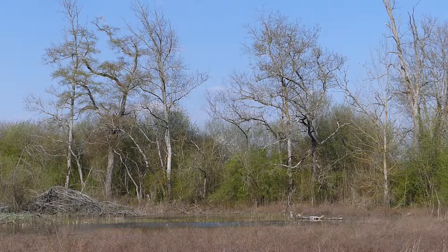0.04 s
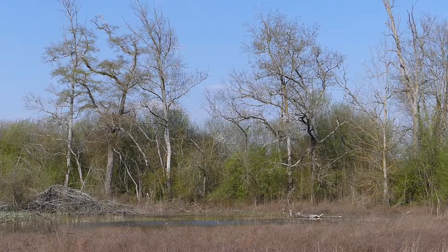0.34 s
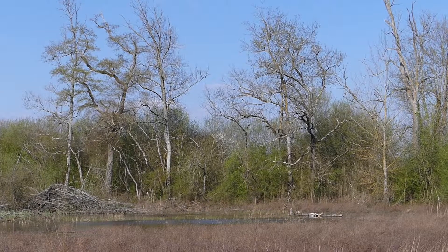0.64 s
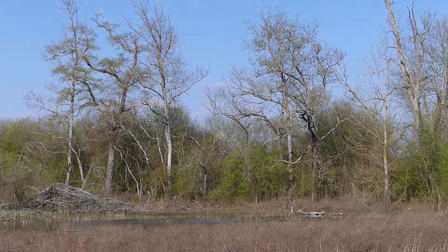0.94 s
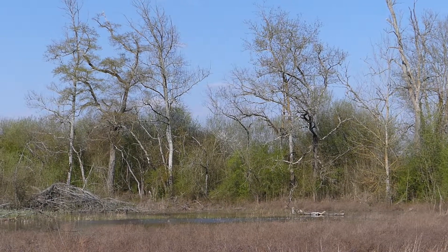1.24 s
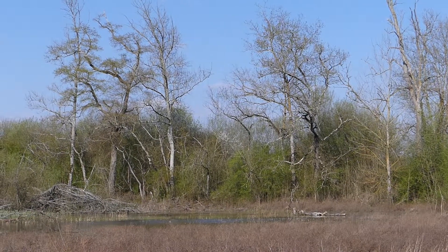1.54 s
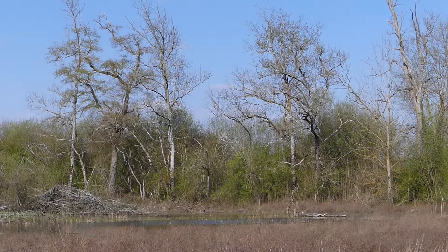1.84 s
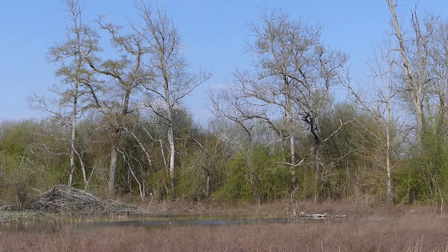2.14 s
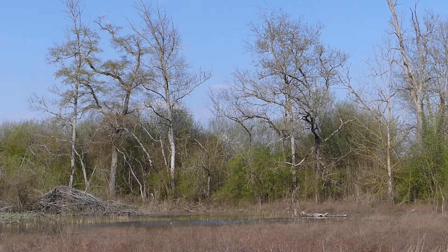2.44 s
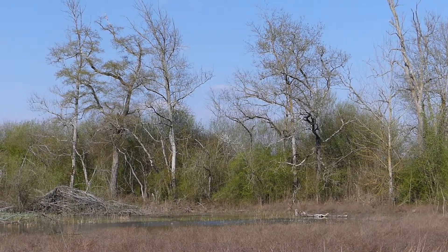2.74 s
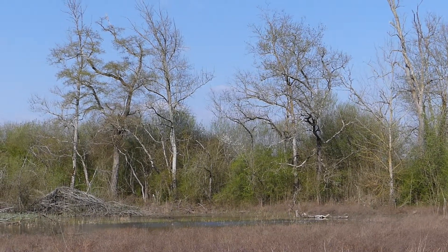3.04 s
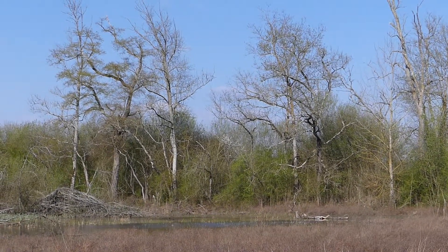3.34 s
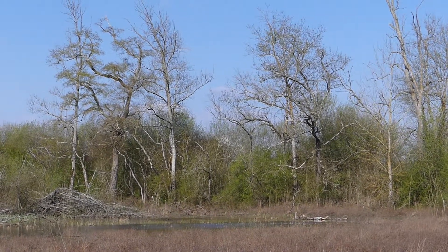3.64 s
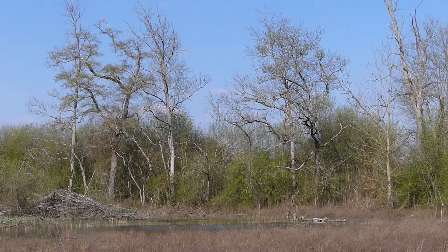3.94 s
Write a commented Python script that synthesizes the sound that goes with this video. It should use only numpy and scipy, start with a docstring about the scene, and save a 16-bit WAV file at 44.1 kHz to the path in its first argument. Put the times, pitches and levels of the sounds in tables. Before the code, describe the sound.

A chorus of frogs croaking near and far across a pond, with light wind.

```python
"""A frog chorus from the bank of a marshy pond, in stereo. It fades in on a far crowd, faint hiss and a
low breeze, with croaks and then quacks close by; every call is a train of pulses ringing a vocal sac.
From about one second, thin whistles carry across the marsh and dry stalks tick near the microphone.
Midway, three puffs of wind bump the microphone; near the end come two rattling croaks.
All along, the reeds scatter the calls and the trees around the water answer."""
import sys
import numpy as np
from scipy import signal
from scipy.fft import rfft, irfft, next_fast_len
from scipy.io import wavfile
from scipy.ndimage import uniform_filter1d, map_coordinates

SR = 44100
rng = np.random.default_rng(int(sys.argv[2]) if len(sys.argv) > 2 else 0)


def pcm_store(signal):
    """Save signal as 16-bit PCM."""
    levels = np.round(np.clip(np.atleast_2d(signal), -1, 1) * 32767)
    wavfile.write(sys.argv[1], SR, levels.astype(np.int16).T)


N = 176400


def amp(db):
    """Decibels to gain."""
    return 10 ** (np.asarray(db) / 20)


def unit(x):
    """Scale to rms 1."""
    return x / np.sqrt(np.mean(x ** 2) + 1e-20)


def along(points, hz):
    """Read between (Hz, value) points on a log frequency axis."""
    freqs, values = np.transpose(points)
    return np.interp(np.log(hz + 1), np.log(freqs + 1), values)


def wobble(rate):
    """A smooth random curve, rate knots a second."""
    return map_coordinates(rng.standard_normal(int(N * rate / SR) + 4), [np.arange(N) * rate / SR])


def filtered(x, response):
    """Filter x by a gain given as a function of Hz."""
    size = next_fast_len(x.shape[-1] + 8192)
    return irfft(rfft(x, size) * response(np.fft.rfftfreq(size, 1 / SR)), size)[..., :x.shape[-1]]


def add(track, start, sound):
    """Mix a sound into the track at start seconds."""
    part = track[..., max(0, round(start * SR)):][..., :sound.shape[-1]]
    part += sound[..., :part.shape[-1]]


def swell(sound, peak, rise, fall):
    """Shape a call: up to its loudest point (0-1) and down again, on power curves."""
    u = np.linspace(0, 1, len(sound))
    return sound * np.minimum(u / peak, 1) ** rise * np.minimum((1 - u) / (1 - peak), 1) ** fall


# Open air at the microphone. Each row: frequency in Hz, left-right correlation.
LIKENESS = [(60, 0.23), (400, 0.18), (800, 0.53), (1500, 0.79), (2500, 0.62), (5000, 0.5), (12000, 0.43)]
def widen(pair):
    """Two unrelated signals to left and right, as alike as the open air makes them."""
    turn = lambda hz: np.arccos(along(LIKENESS, hz)) / 2
    mid, side = filtered(pair, lambda hz: np.array([np.cos(turn(hz)), np.sin(turn(hz))]))
    return np.array([mid + side, mid - side])


def rush(spectrum, patchy_db):
    """Stereo noise of rms 1 with patches of random gain in time and frequency."""
    bins = signal.stft(rng.standard_normal((2, N)), nperseg=512)[2]
    patches = uniform_filter1d(uniform_filter1d(rng.standard_normal(bins.shape[1:]), 5, 0), 8, 1)
    pair = signal.istft(bins * amp(patchy_db * unit(patches)), nperseg=512)[1][:, :N]
    return unit(widen(filtered(pair, lambda hz: amp(along(spectrum, hz)))))


# The far end of the marsh. Each row: frequency in Hz, relative level in dB.
WASH_SPECTRUM = [(150, -40), (280, -10), (385, -1.5), (500, -6), (770, -3), (960, -12), (1200, 2),
                 (1500, -3), (2100, -9.5), (2450, -13), (2850, -25.5), (3650, -20), (4300, -34),
                 (5200, -42.5)]
def farthest_frogs(level_db=-42.5):
    """So many frogs, so far off, that they blur into a wavering wash."""
    return amp(level_db + 2.0 * wobble(5.52)) * rush(WASH_SPECTRUM, patchy_db=3.0)


# The background on the bank, high and low. Each row: frequency in Hz, relative level in dB.
HISS_SPECTRUM = [(1000, -4.5), (3000, -5.5), (5000, 6.5), (7000, 2), (7800, -2), (9500, 4.5), (12000, -0.5),
                 (15500, -3)]
BREEZE_SPECTRUM = [(25, -26), (45, -20.5), (70, -3.5), (200, -4), (350, -3), (600, -11.5), (1500, -46)]
def hiss_and_breeze(hiss_db=-60.5, breeze_db=-50.5):
    """A faint high hiss over the low, uneven rush of the breeze."""
    hiss = amp(hiss_db) * rush(HISS_SPECTRUM, patchy_db=2.3)
    breeze = amp(breeze_db + 0.73 * wobble(8.76)) * rush(BREEZE_SPECTRUM, patchy_db=2.5)
    return hiss + breeze


CROAK_PULSE_HZ = 381.6
# A frog's body resonances. Each row: frequency in Hz, level in dB against the sac, ring in seconds.
BODY_MODES = [(385, -22, .0012), (560, -30, .0005), (775, -25, .0009), (1170, -19, .0008)]
def frog_voice(length, sac_hz, pulse_hz, overtone_db, jitter, tone_db=1, buzz_db=-6):
    """Pulses ring the sac, its overtone and the body; sac_hz and pulse_hz glide (first, last)."""
    n = int(length * SR)
    chance = rng.standard_normal((160, 2))
    glide = np.linspace(0, 1, n) ** 1.45  # the pulse rate holds at first and moves late in the call
    cycles = np.cumsum(pulse_hz[0] * (pulse_hz[1] / pulse_hz[0]) ** glide) / SR
    onsets = np.interp(np.arange(int(cycles[-1]) + 1), cycles, np.arange(n))[:len(chance)]
    late, strength = chance[:len(onsets)].T
    onsets = np.abs(onsets + jitter * late * SR / pulse_hz[0])  # jitter is in pulse periods
    index = np.ceil(onsets).astype(int)[:, None] + np.arange(SR // 100)
    age = (index - onsets[:, None]) / SR  # seconds since the pulse, one row for each
    train = lambda rows: np.bincount(index.ravel(), (rows * amp(1.43 * strength)[:, None]).ravel(), n)[:n]

    sac = np.interp(onsets, [0, n], sac_hz)[:, None]
    overtone = 4240 * (1.894 * sac / 4240) ** 0.39  # stays near 4240 Hz, following the sac only in part
    buzz = (3306, overtone_db + buzz_db, 0.00025)  # so short a ring that it sounds broad
    modes = [(sac, 0, 0.0005), (overtone, overtone_db, 0.00033), buzz, *BODY_MODES]
    rings = sum(amp(db) * age / ring_s * np.exp(-age / ring_s) * np.sin(2 * np.pi * hz * age)
                for hz, db, ring_s in modes)

    # Fed briefly by each pulse, the sac sings on between them, never quite steady.
    wander = map_coordinates(rng.standard_normal(32), [np.arange(n) * 55.1 / SR], mode='mirror')
    note_hz = np.linspace(*sac_hz, n) * (1 + 0.01826 * wander)
    tone = train(age * np.exp(-age / 0.00076)) * np.sin(2 * np.pi * np.cumsum(note_hz) / SR)
    return unit(unit(train(rings)) + amp(tone_db) * unit(tone))


# The chorus across the pond, rising and ebbing. Each row: time in seconds, relative level in dB.
CROWD_LEVELS = [(.5, -44.5), (1.201, -44), (1.5, -45.5), (1.65, -41.5), (1.85, -58.5), (2.2, -37),
                (2.45, -52), (2.8, -50), (3.25, -38.5), (3.8, -39.5), (4, -43)]
def far_frogs(calls_per_s=45, gain_db=2):
    """A crowd croaks at random, each call with its own length, level, note, pace and side."""
    out = np.zeros((2, N))
    calls = rng.standard_normal((int(calls_per_s * N / SR), 6))
    for k, (when, long, loud, note, pace, side) in enumerate(calls):
        sac_hz = 1714 * np.exp(0.17 * np.clip(note, -1.4, 1.6))
        pulse_hz = CROAK_PULSE_HZ * np.exp(0.11 * pace)
        length = 0.0475 * np.exp(0.31 * long)
        call = frog_voice(length, (sac_hz * .94, sac_hz * 1.06), (pulse_hz * 1.04, pulse_hz * .96),
                          overtone_db=-16.5, jitter=0.056)
        gains = amp(2.2 * loud + 1.2 * side * np.array([[1], [-1]]))
        add(out, (k + when) / calls_per_s, gains * swell(call, peak=.5, rise=.7, fall=.7))
    return unit(out) * amp(gain_db + np.interp(np.arange(N) / SR, *np.transpose(CROWD_LEVELS)))


# Lower calls on the near bank. Each row: start and length in seconds, level in dB,
# first and last sac note in Hz.
NEAR_CROAKS = [(0.392, 0.072, -35, 1694, 1940), (0.455, 0.051, -28.5, 1231, 1456),
               (.53, 0.045, -27, 1980, 1794), (0.575, 0.022, -28, 1267, 1233),
               (0.726, 0.021, -26.5, 1360, 1604), (0.737, 0.051, -24.5, 1947, 2084),
               (.83, 0.038, -30.5, 1151, 1447), (.989, 0.027, -27, 1979, 1750),
               (1.015, 0.043, -27.5, 1360, 1692), (1.205, 0.029, -26.5, 1428, 1483),
               (1.231, 0.021, -27, 1678, 1750), (1.277, 0.034, -34.5, 1948, 1970),
               (1.351, 0.044, -32, 1878, 1742), (1.389, 0.032, -25.5, 1487, 1700),
               (1.418, 0.023, -52, 1710, 1820), (1.515, 0.038, -44, 1285, 1450),
               (1.556, 0.07, -30.5, 1652, 1842), (1.606, 0.058, -28, 1461, 1533),
               (1.655, 0.029, -26, 1493, 1673), (1.681, 0.029, -34, 1750, 1735),
               (1.747, 0.053, -40.5, 1108, 1273), (1.877, 0.023, -38, 1266, 1124),
               (2.053, 0.088, -28, 1600, 1710), (2.13, 0.026, -27, 1575, 1450),
               (2.162, 0.034, -24, 1481, 1575), (2.198, .027, -22.5, 1588, 1899),
               (2.224, 0.013, -47, 1800, 1850), (2.375, 0.026, -33, 1284, 1403),
               (2.513, 0.031, -33.5, 1290, 1643), (2.663, 0.11, -39.5, 1330, 1590),
               (2.8, 0.033, -37, 1054, 1155), (2.831, 0.032, -31, 1186, 1372),
               (2.992, 0.089, -31, 1299, 1534), (3.017, 0.0677, -30.5, 1835, 2030),
               (3.138, 0.077, -35, 2140, 1917), (3.189, 0.042, -27.5, 1690, 1540),
               (3.222, 0.032, -28, 1890, 1630), (3.241, 0.038, -28.5, 1384, 1666),
               (3.28, 0.046, -30.5, 1277, 1345), (3.4, 0.043, -33, 1255, 1260),
               (3.513, 0.028, -29, 1457, 1267), (3.526, 0.046, -35.5, 1980, 2250),
               (3.565, 0.036, -24, 1507, 1748), (3.594, 0.03, -32.5, 1727, 1754),
               (3.641, .034, -28, 1150, 1334), (3.716, 0.029, -27, 1263, 1194),
               (3.714, 0.034, -26, 1684, 1842), (3.768, 0.014, -21.5, 1770, 1790),
               (3.779, 0.041, -27.5, 1892, 1790), (3.897, 0.022, -31, 1220, 1320)]
def croaks(easy_db=-30):
    """Croaks swell while the sac note glides; effort above an easy croak brightens the overtone."""
    out = np.zeros(N)
    for start, length, db, first_hz, last_hz in NEAR_CROAKS:
        pulse_hz = CROAK_PULSE_HZ * np.exp(0.04 * rng.standard_normal())
        call = frog_voice(length, (first_hz, last_hz), (pulse_hz * 1.03, pulse_hz * .97),
                          overtone_db=-20.5 + 0.82 * (db - easy_db), jitter=0.018)
        add(out, start, amp(db) * swell(call, peak=0.61, rise=0.65, fall=0.6))
    return out


# Bright calls on the near bank. Each row: start and length in seconds, level in dB, sac note in Hz,
# first and last pulse rate in Hz, loudest point from 0 to 1, overtone in dB.
NEAR_QUACKS = [(0.607, 0.07, -24.5, 2118, 439.6, 259.3, 0.22, -27),
               (0.818, 0.073, -24, 2192, 439.8, 242.8, 0.11, -14),
               (0.898, 0.069, -26, 2284, 555.4, 281.3, 0.03, -14),
               (1.064, 0.049, -24, 2230, 560, 349.2, 0.43, -11.5),
               (1.248, 0.025, -21, 2034, 555, 489, 0.97, -13.5),
               (1.784, 0.033, -39, 2350, 493, 353, 0.05, -22),
               (1.915, 0.055, -32, 2150, 511.5, 332, 0.47, -21.5),
               (2.112, 0.08, -31, 2110, 375, 387.5, 0.22, -12),
               (2.453, 0.056, -36, 2336, 490, 393, 0.27, -23),
               (2.596, 0.043, -37, 2220, 475, 330, 0.2, -26),
               (2.733, .035, -39.5, 2260, 488, 372, 0.4, -18),
               (2.872, .07, -27, 1812, 483, 296.4, 0.28, -26.5),
               (3.077, 0.064, -26, 2080, 523, 315.3, 0.1, -17.5),
               (3.271, .045, -25.5, 1954, 504, 347, 0.33, -20.5),
               (3.678, 0.058, -32.5, 2270, 470, 336, 0.3, -17),
               (3.829, 0.036, -32, 2270, 473.7, 358.5, 0.3, -37),
               (3.966, 0.066, -39, 2320, 477.5, 370, 0.25, -24)]
# Weak quacks are rougher. Each row: call level in dB, jitter in pulse periods.
QUACK_ROUGHNESS = [(-40, .06), (-33, .04), (-27, .008), (-23, .003)]
def quacks():
    """Buzzy quacks: the sac note droops a little and, in nearly all, the pulses slow down."""
    out = np.zeros(N)
    for start, length, db, sac_hz, first_rate, last_rate, peak, overtone_db in NEAR_QUACKS:
        jitter = np.interp(db, *np.transpose(QUACK_ROUGHNESS))
        call = frog_voice(length, (sac_hz, sac_hz * .97), (first_rate, last_rate), overtone_db, jitter,
                          tone_db=-13, buzz_db=5.5)
        add(out, start, amp(db) * swell(call, peak, rise=0.76, fall=0.66))
    return out


# Held calls far across the marsh. Each row: start and length in seconds, level in dB, note in Hz.
FAR_WHISTLES = [(2.68, .42, -58, 3600), (1.1, .28, -57, 4200), (1.55, .14, -52, 3950),
                (2.06, .2, -52, 3800)]
def whistles(width_hz=120):
    """Thin, fuzzy notes: narrow bands of noise that grow until just before they stop."""
    out = np.zeros(N)
    for start, length, db, note_hz in FAR_WHISTLES:
        band = filtered(rng.standard_normal(SR), lambda hz: np.exp(-((hz - note_hz) / width_hz) ** 2))
        add(out, start, amp(db) * swell(unit(band[:int(length * SR)]), peak=0.97, rise=0.41, fall=0.6))
    return out


# Dry stalks close to the microphone. Each row: start in seconds, level in dB, ring in Hz.
STALK_TICKS = [(1.1645, -27.5, 3370), (1.1738, -40, 7400), (1.861, -46, 6700), (1.894, -45, 6850),
               (2.2368, -35, 9600), (2.2437, -24.5, 4300), (2.2446, -35.5, 8900), (3.9558, -38, 3500),
               (3.9755, -31, 10000), (3.9925, -50, 9900)]
def stalks(ring_s=0.00072, crack_s=0.00061, crack_db=-5, tail_s=0.018, tail_db=-24):
    """Dry stalks tick: a crack, a brief ring and a faint scatter."""
    out, t = np.zeros((2, N)), np.arange(SR // 20) / SR
    for start, db, hz in STALK_TICKS:
        crack = amp(crack_db) * np.exp(-t / crack_s) * rng.standard_normal(len(t))
        ring = np.exp(-t / ring_s) * np.sin(2 * np.pi * hz * t)
        tail = amp(tail_db) * np.exp(-t / tail_s) * rng.standard_normal((2, len(t)))
        add(out, start, amp(db) * (crack + ring + tail))
    return out


# Wind right on the microphone, in three clusters. Each row: centre and half width in seconds,
# level in dB, frequency in Hz.
WIND_BUMPS = [(1.883, 0.0076, -23.5, 169), (1.895, 0.013, -26.5, 100), (1.899, 0.0053, -32.5, 273),
              (2.09, .008, -29.5, 114), (2.113, 0.006, -22, 163), (2.408, 0.0038, -32, 155),
              (2.428, 0.0065, -33.5, 270), (2.438, 0.0082, -25, 116)]
def wind_puffs(side_db=-8.5):
    """Each bump of wind shakes both microphone ports for a few cycles, not quite alike."""
    t = np.arange(N) / SR
    push = sum(amp(db) * np.exp(-((t - centre) / width) ** 2 + 2j * np.pi * hz * (t - centre))
               for centre, width, db, hz in WIND_BUMPS)
    mid, side = push.imag, amp(side_db) * push.real  # a quarter cycle apart
    return np.array([mid + side, mid - side])


# Long calls on the near bank. Each row: start and length in seconds, level in dB,
# first and last sac note in Hz, typical bursts per second.
NEAR_RATTLES = [(3.318, .19, -27.5, 1847, 1607, 78), (3.753, .195, -30.5, 1786, 1714, 84)]
def rattles(depth_db=4.6):
    """Long croaks chopped into quick, uneven bursts."""
    out = np.zeros(N)
    for start, length, db, first_hz, last_hz, burst_rate in NEAR_RATTLES:
        call = frog_voice(length, (first_hz, last_hz), (CROAK_PULSE_HZ, CROAK_PULSE_HZ * .92),
                          overtone_db=-14, jitter=0.04, tone_db=3)
        cycles = np.cumsum(burst_rate * np.exp(.45 * wobble(54.2)[:len(call)])) / SR
        chopped = unit(call * amp(depth_db * np.sin(2 * np.pi * cycles)))
        add(out, start, amp(db) * swell(chopped, peak=0.55, rise=0.083, fall=0.52))
    return out


def through_reeds(calls, scatter_db=-13.5, decay_s=0.009):
    """The calls plus a brief, dense scatter from the reeds around the frogs."""
    t = np.arange(SR // 25) / SR
    scatter = rng.standard_normal(len(t)) * np.exp(-t / decay_s) * (t > .001)
    scatter /= np.linalg.norm(scatter)
    return calls + amp(scatter_db) * signal.fftconvolve(calls, scatter[None], axes=1)[:, :N]


def through_air(calls):
    """The air dulls the calls on their way to the microphone."""
    # Each row: frequency in Hz, gain in dB.
    air = [(60, -18.5), (250, -1), (400, 1), (2400, -3.5), (2900, -3), (3300, -0.5), (4400, -3.5),
           (4800, -18.5), (7000, -19)]
    return filtered(calls, lambda hz: amp(along(air, hz)))


# The trees around the water. Each row: frequency in Hz, seconds for the echo to fall 60 dB.
TREE_DECAY = [(200, 0.37), (400, 0.76), (900, 0.15), (2000, 0.42), (4000, 0.59), (10000, 0.088)]
def tree_echo(calls, level_db=-12, build_s=0.0042):
    """The tree line scatters the calls back; each frequency dies at its own speed."""
    hz, t, bins = signal.stft(rng.standard_normal((2, SR)), SR, nperseg=256)
    envelope = amp(-60 * t / along(TREE_DECAY, hz)[:, None]) * (1 - np.exp(-t / build_s))
    tail = signal.istft(bins * envelope, SR, nperseg=256)[1]
    frog_band = filtered(tail[0], lambda hz: hz < SR / 8)
    tail = widen(tail) / np.linalg.norm(frog_band)
    return amp(level_db) * signal.fftconvolve(calls, tail, axes=1)[:, :N]


def scene():
    """The pond from the bank: frogs, echo and wind puffs lean slightly left; background and stalks."""
    near_frogs = quacks() + croaks() + rattles()
    calls = through_air(through_reeds(near_frogs + far_frogs() + whistles()))
    wash = farthest_frogs()
    background = hiss_and_breeze()
    lean_left = amp([[0.53], [-0.53]])
    return (calls + tree_echo(calls) + wash + wind_puffs()) * lean_left + background + stalks()


def record(dry):
    """A fade-in from silence, with the highest treble cut off."""
    silent_s, fade_s, top_hz = 0.3, 0.91, 15800
    fade = np.clip((np.arange(N) / SR - silent_s) / fade_s, 0, 1) ** 0.67
    return filtered(dry * fade, lambda hz: hz < top_hz)


dry = scene()
out = record(dry)
pcm_store(out)
```